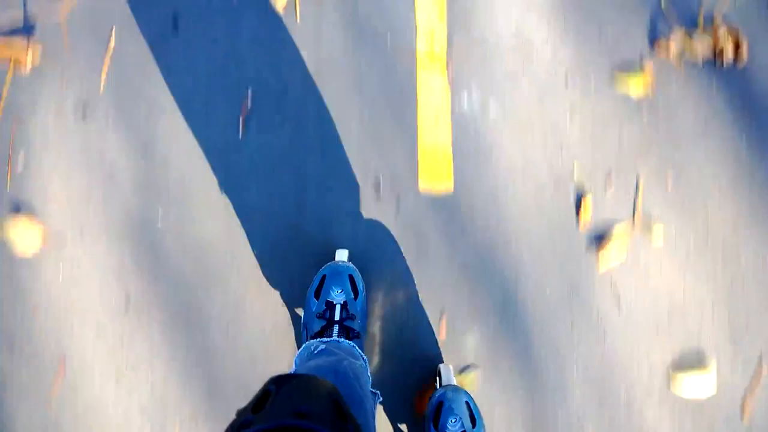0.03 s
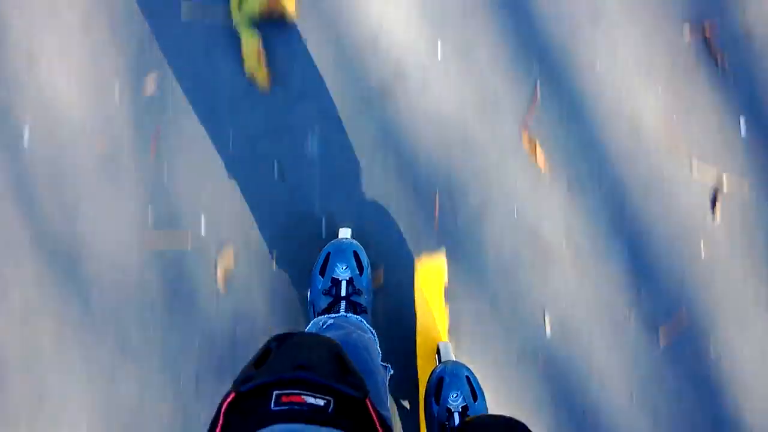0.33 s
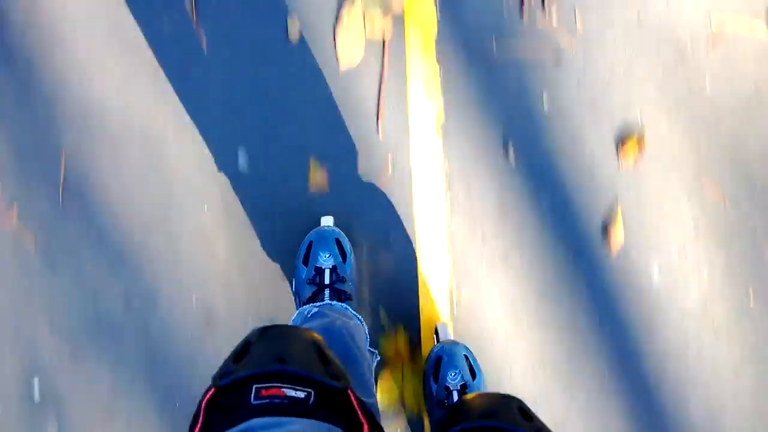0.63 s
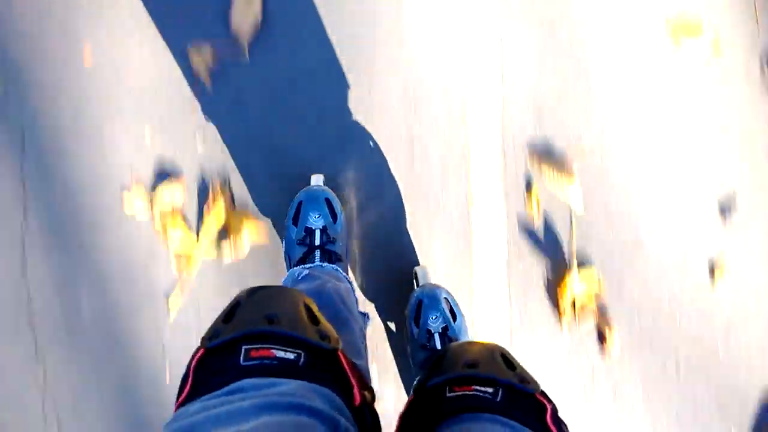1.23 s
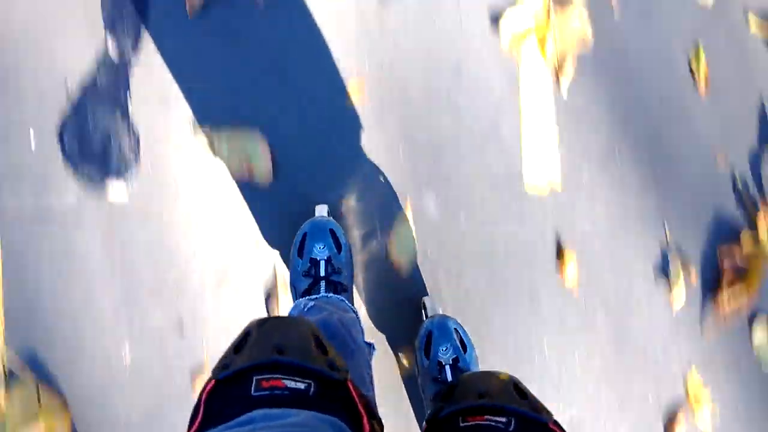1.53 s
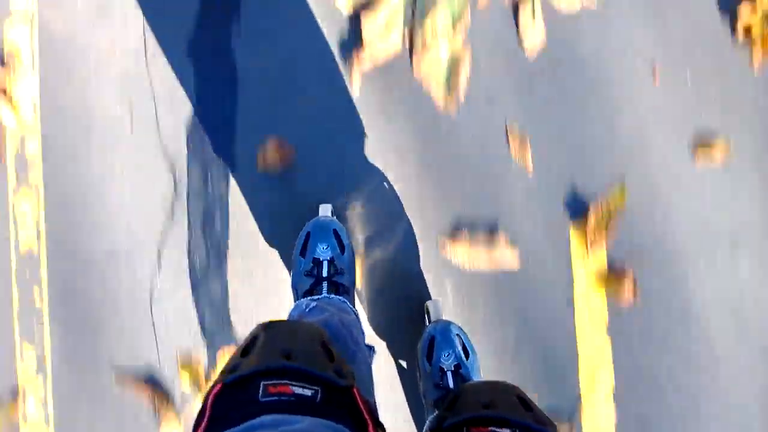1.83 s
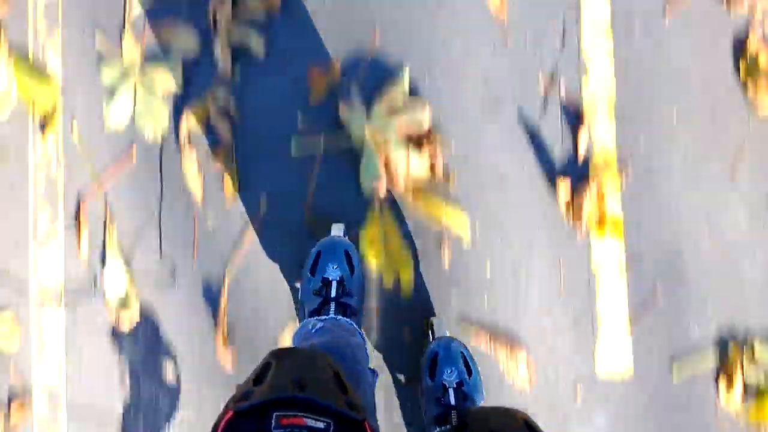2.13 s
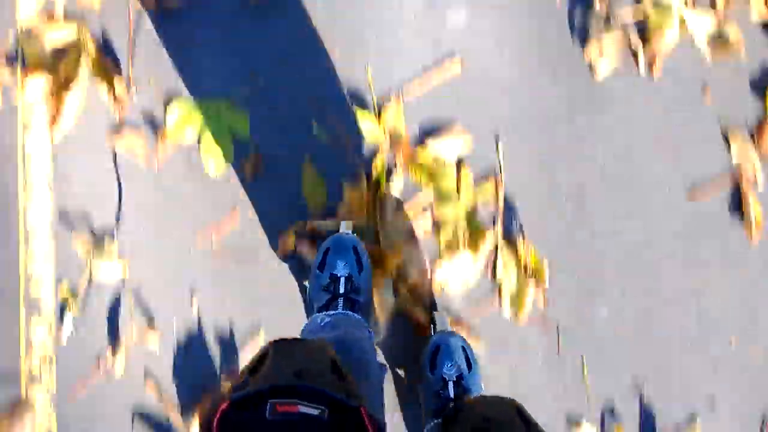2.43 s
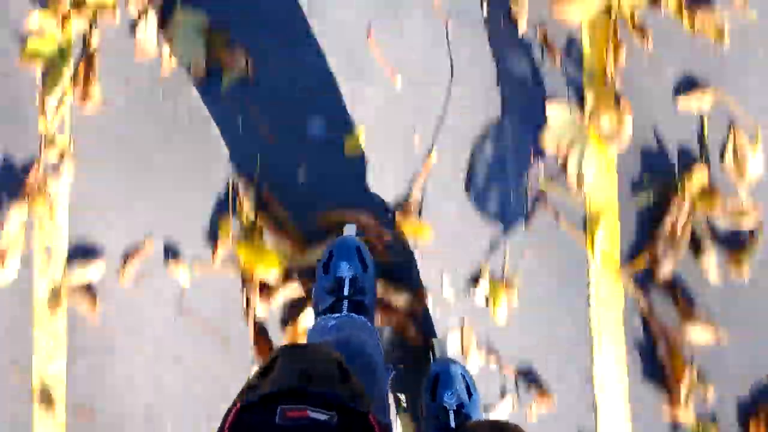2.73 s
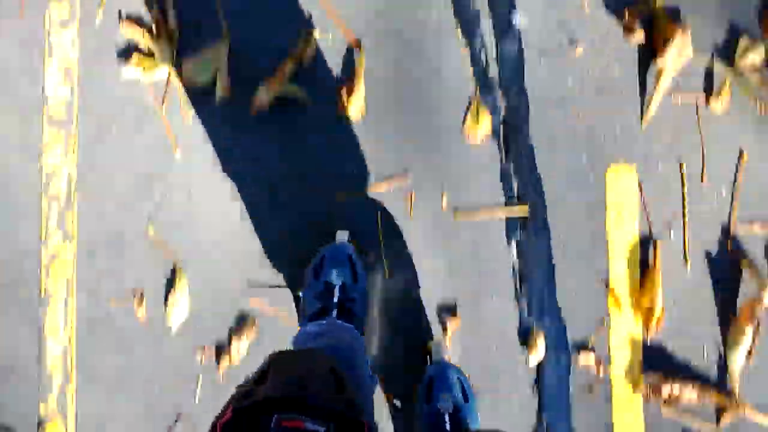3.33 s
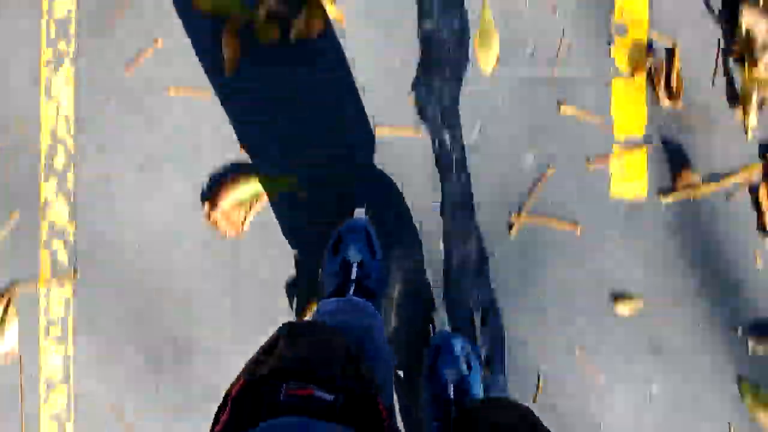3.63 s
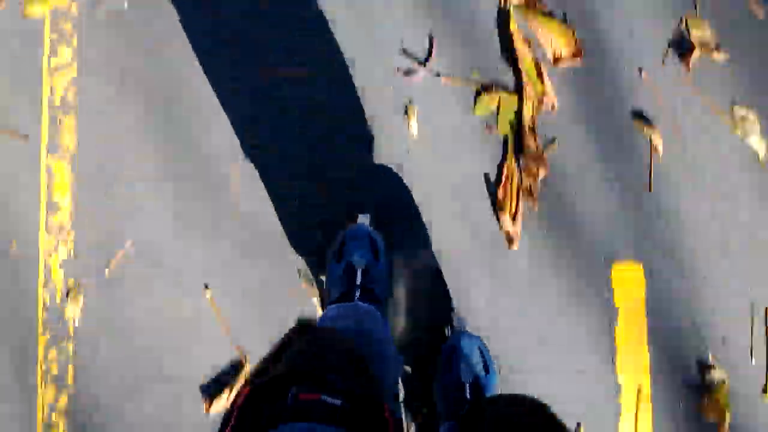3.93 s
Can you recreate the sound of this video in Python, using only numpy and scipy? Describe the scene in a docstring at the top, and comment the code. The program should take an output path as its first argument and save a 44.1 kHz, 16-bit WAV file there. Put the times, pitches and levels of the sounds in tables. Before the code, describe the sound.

Inline skates rumble along an asphalt path, crunching dry leaves and snapping stalks in short bursts. Wind buffets the microphone above them, first mostly on the right, then hard on the left after the loudest crunching.

```python
"""Inline skates coast along an asphalt path strewn with dry leaves, heard from waist height.
From the start the wheels rumble and hiss on grit, leaves break in bursts of tiny cracks, and stalks snap.
A head wind buffets the two microphone openings in separate gusts, at first mostly on the right.
After two seconds the crunching is loudest, and big swirls of air thump more often on the microphone.
Near the end the wind blows hard on the left and the hiss of the grit grows."""
import sys
import numpy as np
from scipy.fft import rfft, irfft
from scipy.io import wavfile
from scipy.ndimage import uniform_filter1d

SR = 44100
rng = np.random.default_rng(int(sys.argv[2]) if len(sys.argv) > 2 else 0)


def store_wav(level_fs):
    """Save 16-bit WAV to argv[1]."""
    pcm = np.round(np.clip(np.atleast_2d(level_fs), -1, 1) * 32767)
    wavfile.write(sys.argv[1], SR, pcm.T.astype(np.int16))


N = 176400
T = np.arange(N) / SR
HZ = np.maximum(np.fft.rfftfreq(N, 1 / SR), 1)
SIDES = np.array([[1], [-1]])   # plus for left, minus for right

# The tone of a breaking leaf or stalk. Each row: frequency in Hz, relative level in dB.
LEAF_TONE = [(200, -24), (700, -1.5), (1500, -4.5), (2400, -2.5), (3000, -4), (3900, 3), (5200, 7.5),
             (6300, 2.5), (7600, -5.5), (9500, -4), (12300, -1), (14500, -4), (16000, -9)]


def wheels():
    """The wheels rumble over the rough asphalt and tick through fine grit."""
    # The tones of the rumble and the grit. Each row: frequency in Hz, relative level in dB.
    rumble_tone = [(25, -2.5), (170, -0.5), (280, -12.5), (450, -14), (650, -25), (930, -22.5),
                   (1450, -40.5), (2050, -38.5), (2900, -59.5), (5000, -85)]
    grit_tone = [(1000, -16), (2100, -3), (2900, -5.5), (3400, -7), (4300, -1.5), (5200, 3), (6400, -2),
                 (8000, -10), (12000, -6), (16000, -19.5)]
    # How loud the grit is. Each row: time in seconds, level in dB.
    grit_levels = [(.5, -63), (3, -60.5), (3.7, -56), (4, -53)]
    rumble = colour(stereo(rng.standard_normal((2, N)), alike=0.77), rumble_tone)
    rumble_db = -35 + 4 * drift(rate_hz=12)
    grit = from_ground(crackle(per_s=4000, spread_db=3, fade_s=0.006), grit_tone)
    return rumble * from_db(rumble_db) + grit * from_db(over_time(grit_levels))


def leaves():
    """Each leaf under a wheel gives a swell of sharp cracks and fine rustle that dies away."""
    # Crushed leaves. Each row: start in seconds, rise in seconds, peak level in dB,
    # fade in dB per second, extra treble in dB.
    crunches = [(.057, 0.0086, -34.5, 371, -0.5), (.18, 0.029, -46.5, 175, 1.5), (0.6, 0.016, -35, 211, -2),
                (.62, 0.015, -34, 202, -2.5), (0.791, 0.0022, -41.5, 182, -0.5),
                (0.971, 0.0031, -50.5, 82, 1), (1.06, .015, -47, 150, -1), (1.135, 0.0055, -51.5, 149, 4.5),
                (1.68, 0.066, -49, 142, 0.5), (1.946, 0.011, -33, 85, 2), (2.18, 0.0064, -32, 88, 1),
                (2.204, 0.039, -27, 145, 2.5), (2.421, 0.017, -26, 118, 1.5),
                (2.569, 0.0077, -19.5, 750, -0.5), (2.6, 0.0082, -40, 137, 4.5),
                (2.709, 0.027, -30.5, 149, 3), (2.975, 0.015, -44, 144, 4.5), (3.115, 0.041, -44, 64, 6),
                (3.228, 0.03, -34, 206, 4.5), (3.404, 0.0027, -37.5, 190, 6.5),
                (3.472, 0.0026, -29.5, 199, 5), (3.798, 0.004, -34.5, 171, 4),
                (3.84, 0.03, -37.5, 158, 3.5)]
    swells = np.array([np.clip((T - start) / rise, 0, 1) * from_db(db - fade * (T - start - rise).clip(0))
                       for start, rise, db, fade, _ in crunches])
    crispness = from_db([row[-1] for row in crunches])
    cracks = from_db(-4) * crackle(per_s=1100, spread_db=4.5, fade_s=0.009)
    rustle = from_db(-2.5) * rng.standard_normal((2, N))
    top = treble(cracks + rustle)
    body = (cracks + rustle - top) * np.sqrt(np.sum(swells ** 2, 0))
    body *= from_db(2.53 * drift(rate_hz=17))   # only the part below the treble flickers
    top *= np.sqrt(crispness ** 2 @ swells ** 2)
    return from_ground(body + top, LEAF_TONE)


def stalks(size=3000, crack_s=0.026, tail_s=0.07):
    """Single stalks and leaf ribs snap with a sharp crack and a faint tail."""
    # Snapping stalks. Each row: start in seconds, level in dB, extra treble in dB.
    snaps = [(0.094, -44, 15), (.123, -35.5, -8), (.402, -37.5, -3.5), (0.582, -42, 8.5), (0.605, -27, 1),
             (0.633, -24.5, -3.5), (.795, -29.5, 4), (.852, -32.5, -6), (0.868, -36.5, -9),
             (.902, -35, -13), (.976, -40.5, 2), (1.078, -39.5, 11), (1.109, -49, 15), (1.206, -40, -4),
             (1.267, -41.5, -25), (1.755, -28.5, -12), (2.029, -25.5, -14), (2.183, -26, -12),
             (2.327, -28, -9), (2.367, -34, 9), (2.944, -34, 0), (2.964, -24.5, -6.5), (3.121, -38.5, 5),
             (3.852, -25, 8.5)]
    t, out = np.arange(size) / SR, np.zeros((2, N + size))
    fade = from_db(-60 * t / crack_s) + from_db(-15 - 60 * t / tail_s)
    for start, db, treble_db in snaps:
        i = int(start * SR)
        crack = fade * rng.standard_normal((2, size))
        crack += (from_db(treble_db) - 1) * treble(crack)
        out[:, i:i + size] += from_db(db - 3.5) * crack
    return from_ground(out[:, :N], LEAF_TONE)


def crackle(per_s, spread_db, fade_s, size=600):
    """Tiny cracks, many weak and a few strong: each is noise plus a ring, falling 60 dB in fade_s."""
    starts = np.flatnonzero(rng.random(N) < per_s / SR)
    strength = from_db(spread_db * np.minimum(rng.exponential(1, N), 5))[starts, None]
    t = np.arange(size) / SR
    ring_hz = rng.uniform(2460, 14650, (size, 1))
    rings = np.sin(2 * np.pi * (ring_hz * t + rng.random((2, size, 1))))
    bursts = (rng.standard_normal((2, size, size)) + from_db(-0.5) * rings) * from_db(-60 * t / fade_s)
    cracks = bursts[:, starts % size] * strength
    places = (starts[:, None] + np.arange(size)).ravel()
    mixed = np.array([np.bincount(places, side.ravel(), N + size)[:N] for side in cracks])
    power = uniform_filter1d(np.mean(mixed ** 2, 0), int(0.042 * SR) + 1)
    return mixed / np.sqrt(power + 1e-6)   # even out the level


def from_ground(two, tone, right_lag_s=0.00005, band_hz=3400, band_octaves=0.31):
    """Crisp sound from the ground reaches left and right, hollow at first and fuller later."""
    # How alike the two sides sound. Each row: frequency in Hz, likeness from 0 to 1.
    likeness = [(500, 0.8), (2000, 0.14), (3700, 1), (5000, 0.72), (9000, 0.048)]
    # Which side is louder. Each row: frequency in Hz, left minus right in dB.
    balance = [(500, 2.5), (3500, 2), (5500, -5), (7500, 2), (10000, 3), (16000, 2)]
    # The low treble around band_hz. Each row: time in seconds, boost or cut in dB.
    band_levels = [(0, -4.5), (2, -1.5), (3.5, 1)]
    spectrum = stereo(rfft(colour(two, tone)), at_hz(likeness, HZ))
    spectrum *= from_db(SIDES * at_hz(balance, HZ) / 2)
    spectrum[1] *= np.exp(-2j * np.pi * HZ * right_lag_s)
    band = irfft(spectrum * np.exp(-(np.log2(HZ / band_hz) / band_octaves) ** 2), N)
    return irfft(spectrum, N) + band * (from_db(over_time(band_levels)) - 1)


def wind(side, rise_s=0.012, fall_s=0.037, reference_db=-20):
    """Air swirls at one microphone opening: the stronger the flow, the louder and brighter it is."""
    # The head wind between gusts. Each row: time in seconds, left level in dB, right level in dB.
    breeze = [(0, -53, -45), (.5, -43, -58.5), (.9, -39, -29.5), (1.25, -49, -38.5), (1.9, -55, -29.5),
              (2.25, -42, -29), (2.7, -37, -26.5), (2.9, -47, -38), (3.19, -40, -42), (3.35, -12.5, -54),
              (3.75, -34, -56), (4, -42, -42.5)]
    # Gusts. Each row: start in seconds, length in seconds, strength in dB, side (0 left, 1 right).
    gusts = [(2.355, 0.12, -14, 0), (2.426, 0.19, -17, 0), (2.619, 0.089, -13, 0), (3.294, 0.097, -15, 0),
             (3.442, 0.4, -24, 0), (3.508, 0.098, -16.5, 0), (3.587, 0.13, -14.5, 0),
             (0.047, 0.071, -24, 1), (0.827, 0.11, -26.5, 1), (1.334, 0.15, -24.5, 1),
             (1.65, 0.089, -21, 1), (1.709, 0.11, -22, 1), (1.901, 0.159, -23.5, 1), (2.051, 0.097, -19, 1),
             (2.268, 0.27, -19.5, 1), (2.319, 0.215, -21, 1), (2.558, 0.13, -20, 1), (2.602, 0.068, -17, 1),
             (2.713, 0.038, -21, 1)]
    # The wind's tone at reference_db, left then right. Each row: frequency in Hz, relative level in dB.
    tones = ([(20, 2), (70, 5.5), (200, 0.5), (450, -19.5), (750, -33), (1200, -58), (3000, -68)],
             [(20, -2.5), (100, -1.5), (450, -8.5), (950, -18), (1550, -32.5), (2050, -35), (2700, -42),
             (6000, -93)])
    # How wind brightens, left then right. Each row: frequency in Hz, dB of noise per dB of wind.
    growth = ([(40, 0.3), (200, 0.82), (500, 1.87), (1300, 2.5)], [(65, 0.13), (200, 0.53), (500, 0.84),
              (1300, 1.91)])
    flow = from_db(over_time(breeze)[side]) ** 2
    for start, length, db, gust_side in gusts:
        if round(gust_side) == side:
            swell = np.clip(np.minimum((T - start) / rise_s, (start + length - T) / fall_s), 0, 1)
            flow += (from_db(db) * swell) ** 2
    flow_db = 10 * np.log10(flow) - reference_db + 2 * drift(rate_hz=180)
    sputter_db = 1.5 * np.minimum(drift(rate_hz=260), 2)   # single swirls make the top sputter
    swirls = rfft(colour(rng.standard_normal(N), tones[side]))
    out = np.zeros(N)
    for hz in 16 * 2. ** np.arange(10):   # one octave at a time
        band = irfft(swirls * np.maximum(1 - abs(np.log2(HZ / hz)), 0), N)
        band_db = -21.5 + flow_db * at_hz(growth[side], hz) + sputter_db * hz / (hz + 600)
        out += band * from_db(band_db)
    return out


def thumps(fade_cycles=0.66):
    """A big swirl of air hits one opening: the pressure swings a few times and is gone."""
    # Big swirls. Each row: peak time in seconds, level in dB, pitch in Hz, side (0 left, 1 right).
    hits = [(.301, -12.5, 169, 0), (0.937, -10, 187, 0), (1.398, -16, 690, 1), (2.082, -7.5, 182, 0),
            (2.291, -8, 180, 1), (2.402, -5, 228, 0), (2.628, -6.5, 243, 0), (2.656, -10, 166, 0)]
    out = np.zeros((2, N))
    for (peak_s, db, hz, side), phase in zip(hits, rng.random(len(hits))):
        cycles = (T - peak_s) * hz
        swell = from_db(db) * np.exp(-abs(cycles) / fade_cycles)
        out[round(side)] += swell * np.sin(2 * np.pi * (cycles + phase))
    return out


def from_db(db):
    """Turn decibels into a number to multiply by."""
    return 10 ** (np.asarray(db) / 20)


def unit_power(x):
    """Scale to an average power of 1."""
    return x / np.sqrt(np.mean(x ** 2) + 1e-20)


def over_time(rows):
    """Read a table of times and values at every sample."""
    times, *columns = np.transpose(rows)
    return np.array([np.interp(T, times, column) for column in columns])


def at_hz(rows, hz):
    """Read a table of frequencies and values, with octaves evenly spaced."""
    frequencies, values = np.transpose(rows)
    return np.interp(np.log(hz), np.log(frequencies), values)


def drift(rate_hz):
    """A random wobble with a typical size of 1."""
    return unit_power(irfft(rfft(rng.standard_normal(N)) / (1 + (HZ / rate_hz) ** 2), N))


def colour(x, tone):
    """Give a sound a tone; white noise keeps its power."""
    return irfft(rfft(x) * unit_power(from_db(at_hz(tone, HZ))), N)


def stereo(two, alike):
    """Mix two unrelated signals into left and right; alike=1 makes both the same."""
    alike = np.clip(alike, -1, 1)
    return np.sqrt((1 + alike) / 2) * two[0] + np.sqrt((1 - alike) / 2) * two[1] * SIDES


def treble(x, above_hz=7800):
    """The crisp top part of a sound."""
    size = x.shape[-1]
    steep = (np.fft.rfftfreq(size, 1 / SR) / above_hz) ** 10
    return irfft(rfft(x) * steep / (1 + steep), size)


def scene():
    """Wheels, leaves and stalks below, wind on both sides."""
    return wheels() + leaves() + stalks() + thumps() + np.array([wind(0), wind(1)])


def record(dry, start_s=0.057, cutoff_hz=16000):
    """The sound starts suddenly, and the highest treble is cut off."""
    return irfft(rfft(dry * (T >= start_s)) / np.sqrt(1 + (HZ / cutoff_hz) ** 200), N)


dry = scene()
out = record(dry)
store_wav(out)
```